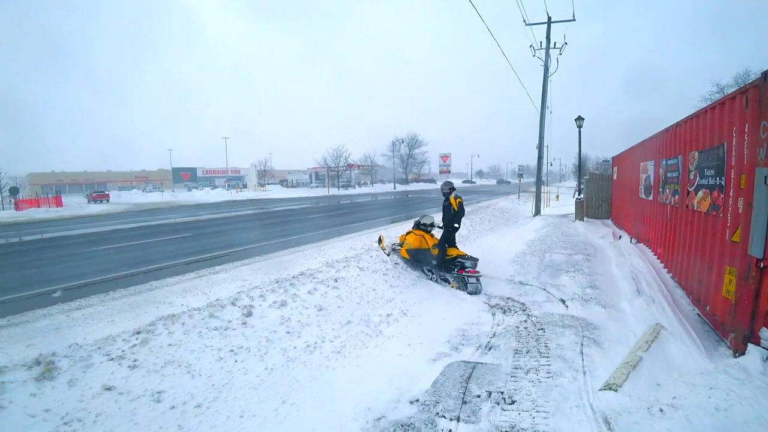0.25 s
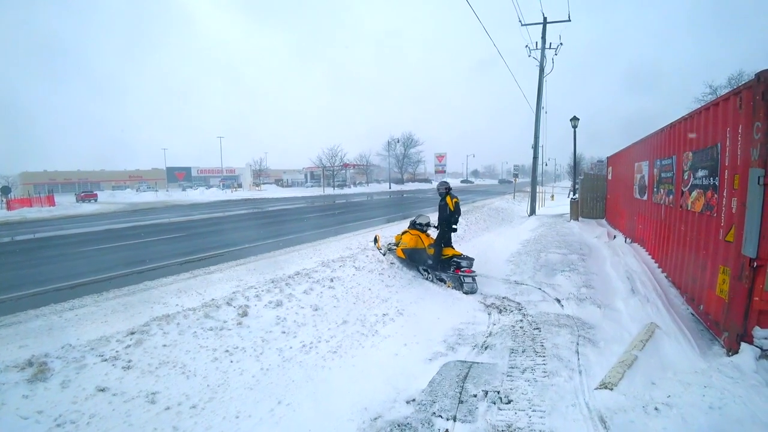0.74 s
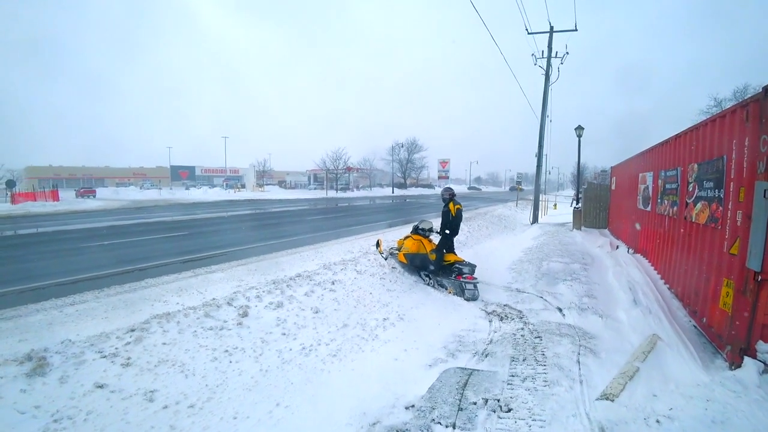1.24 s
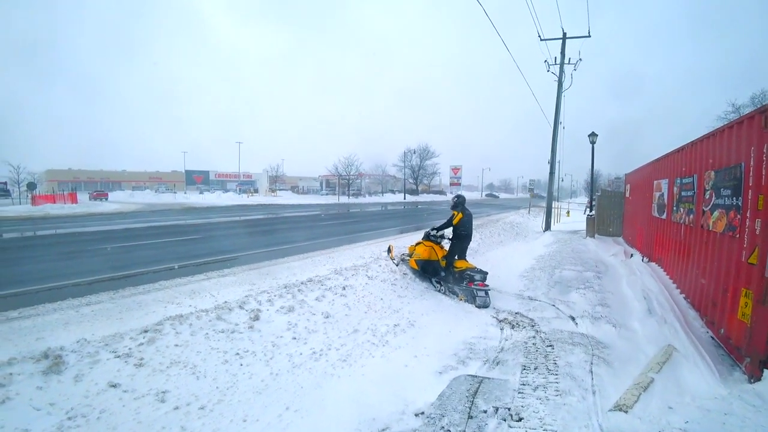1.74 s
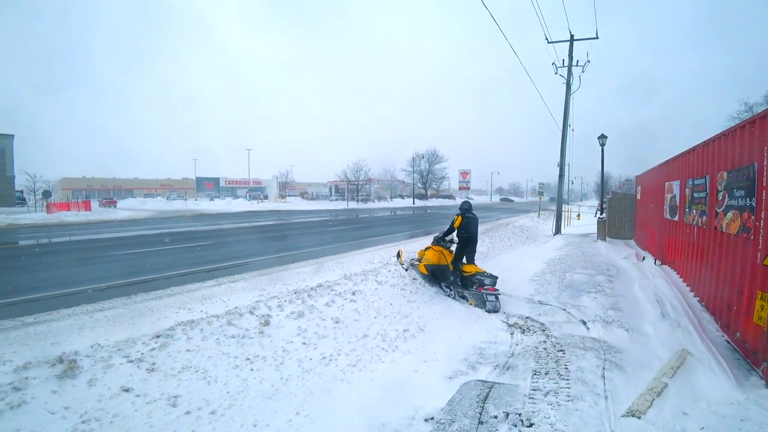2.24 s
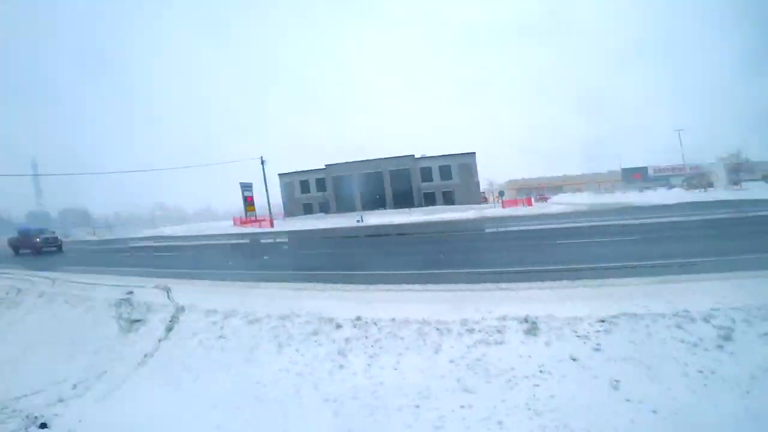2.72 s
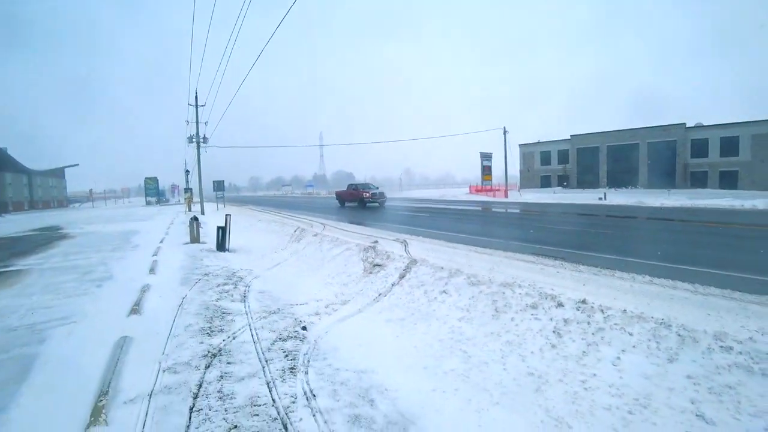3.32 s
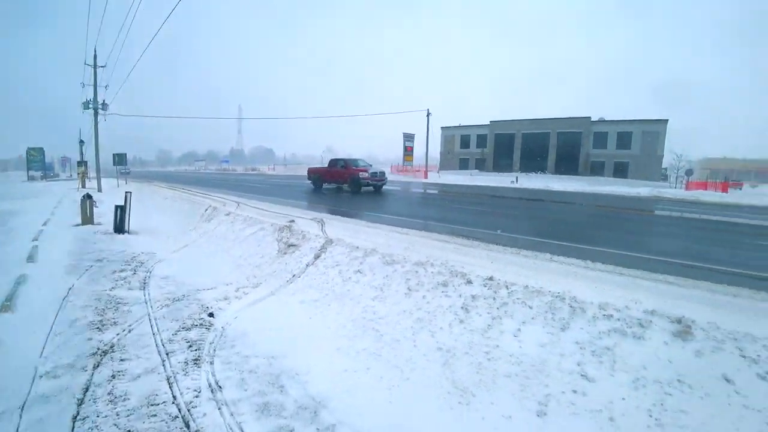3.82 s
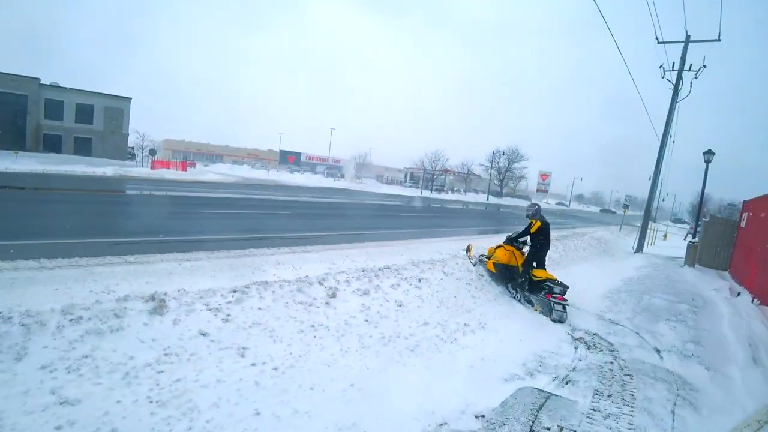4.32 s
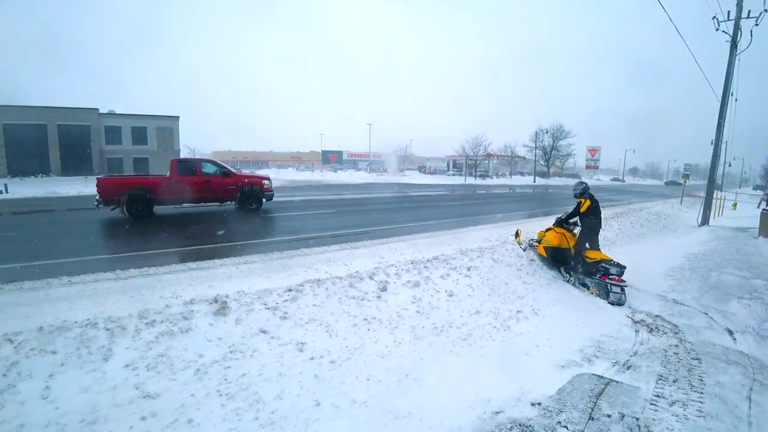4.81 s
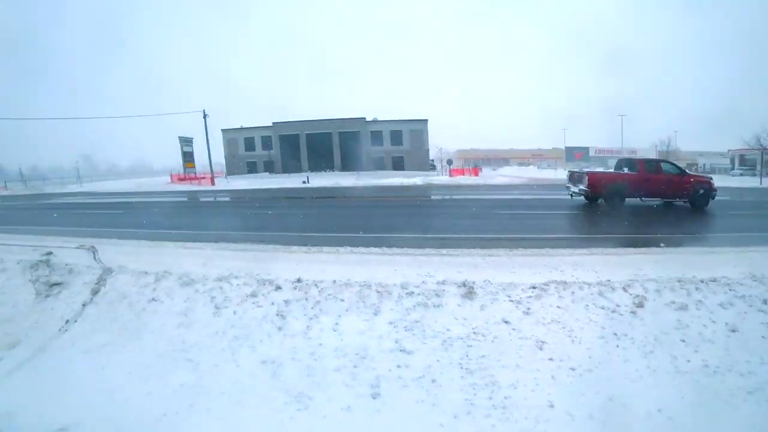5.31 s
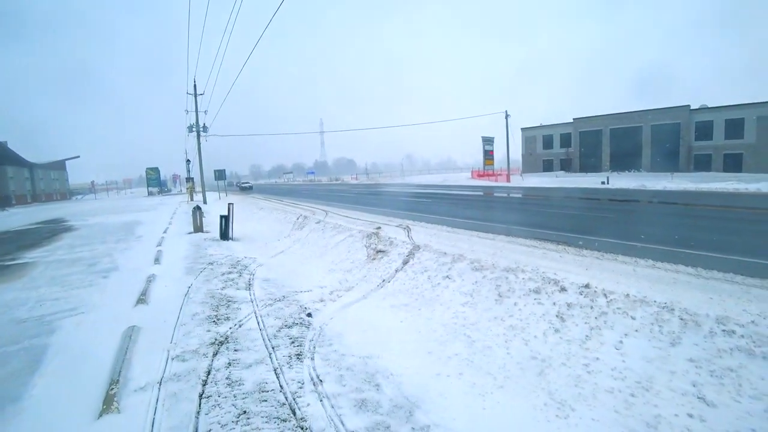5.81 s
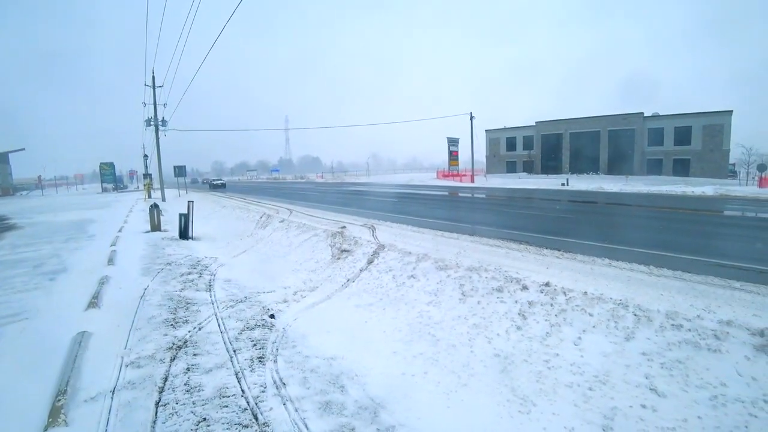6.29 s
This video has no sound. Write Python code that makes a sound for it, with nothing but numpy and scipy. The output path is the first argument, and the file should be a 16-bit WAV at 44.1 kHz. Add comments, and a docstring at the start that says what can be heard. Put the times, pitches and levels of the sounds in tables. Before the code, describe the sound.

Outdoors on a snowy roadside with no echo, a nearby snowmobile engine chugs at idle under light wind rumble. A faint vehicle passes, then wet tyres sizzle closer and a pickup truck goes by with a roar and hiss of spray; another vehicle approaches at the end. Three times the microphone turns with a swish of air, clicks sharply, cuts out for an instant and returns at a different level.

```python
"""At the side of a wet winter road a two-stroke snowmobile idles near the microphone, firing unevenly.
A faint vehicle passes. At 2.7 s the microphone swings up the road, where wet tyres sizzle, and a low
rumble swells as it switches to a louder, bassier setting. At 4 s it swings back and a pickup truck
drives by in the slush; at 5.5 s it turns up the road again. With each swing air swishes past, and the
microphone clicks, drops out for a moment and returns at another level. A breeze buffets it throughout."""
import sys
import numpy as np
from scipy import signal
from scipy.fft import rfft, irfft, next_fast_len
from scipy.io import wavfile
from scipy.ndimage import uniform_filter1d, map_coordinates

SR = 44100
rng = np.random.default_rng(int(sys.argv[2]) if len(sys.argv) > 2 else 0)


def int16_out(signal):
    """Quantize to a 16-bit WAV file."""
    q = np.round(np.clip(np.atleast_2d(signal).T, -1, 1) * 32767)
    wavfile.write(sys.argv[1], SR, q.astype(np.int16))


N = 288855

# the idle hunts a little: (t/s, crankshaft rate/Hz)
IDLE_SPEED = [(0.0, 41.08), (0.53, 39.85), (1.15, 40.45), (1.23, 39.66), (1.64, 40.03), (1.78, 40.94),
              (1.95, 38.92), (2.09, 41.52), (2.45, 40.15), (3.26, 39.54), (3.37, 41.24), (3.51, 39.88),
              (4.41, 40.47), (4.51, 38.93), (4.88, 41.55), (4.96, 40.22), (6.29, 39.89), (6.55, 41.87)]
def crank():
    """Crankshaft turns at every sample, and the firing times: a two-stroke fires once a turn."""
    turns = np.cumsum(np.interp(clock(), *np.transpose(IDLE_SPEED))) / SR + .815
    return turns, np.interp(np.arange(1, int(turns[-1]) + 1), turns, clock())


# gas flow of one exhaust pulse: (f/Hz, level/dB)
EXHAUST_PULSE = [(12, -31), (28, -16.5), (40, 4.5), (80, 3.5), (120, 0), (160, -11.5), (200, -38.5),
                 (280, -41), (325, -44.5), (405, -45.5), (470, -54.5), (620, -64), (900, -80.5),
                 (3000, -130), (8000, -170)]
# the sharper bark of a charge that burns well: (f/Hz, level/dB)
EXHAUST_BARK = [(15, -22), (45, 3), (90, -0.5), (150, -4.5), (200, -14), (290, -19), (420, -21.5),
                (600, -34.5), (1000, -47), (4000, -84.5)]
# crankshaft orders that sing in the silencer and cowling: (multiple, rms level/dB)
CRANK_ORDERS = [(7, -44.5), (9, -49), (10, -47.5), (15, -60.5)]
# gas rushing out of the silencer: (f/Hz, level/dB)
GAS_RASP = [(35, -9), (60, -2.5), (110, 2), (180, 3.5), (280, -1.5), (350, -8), (420, -5.5), (510, -11.5),
            (630, -12.5), (880, -27), (1300, -28.5), (2200, -50), (5000, -68), (13000, -120)]
# clatter of pistons and clutch: (f/Hz, level/dB)
ENGINE_CLATTER = [(600, -24), (1500, 8), (2300, -4), (3700, -4), (6000, -10), (10800, -13.5), (11600, -73)]
def snowmobile(thump_db=-17, bark_db=-29, rasp_db=-35.5, clatter_db=-68, tick_db=-74):
    """Close by, one exhaust pulse per turn; only some charges burn well, and these add a bark."""
    turns, times = crank()
    jitter, strength, quality, knock, scatter = rng.standard_normal((len(times), 5)).T
    stagger_s = .00012 * (-1) ** np.arange(len(times))  # alternate strokes come early and late
    times = times + .00033 * jitter + stagger_s
    flow = shaped(pulses(times, amp(1.12 * strength)), EXHAUST_PULSE)
    radiation_s, bark_lead_s = .004, .0105
    # the outlet radiates the change of flow too: a push, then a suck
    thump = unit(flow + radiation_s * SR * np.gradient(flow))
    burn = 1 / (1 + np.exp(2 - 2 * quality))
    bark = unit(coloured(pulses(times - bark_lead_s + .00099 * scatter, burn), EXHAUST_BARK))
    hum = sum(amp(db + 1.6 * wobble(5.5)) * unit(np.sin(2 * np.pi * order * turns + .88 * wobble(12)))
              for order, db in CRANK_ORDERS)
    # gas noise and clatter swell once a turn, and the pistons tick unevenly
    puff = np.cos(2 * np.pi * turns)
    rasp = unit(rush(GAS_RASP, patchy_db=.5) * amp(4 * puff + .36 * wobble(45)))
    clatter = unit(rush(ENGINE_CLATTER, patchy_db=4) * amp(1.8 * puff + 1.3 * wobble(70)))
    ticks = unit(coloured(pulses(times, amp(9 * np.minimum(knock, 1))), ENGINE_CLATTER))
    exhaust = amp(thump_db) * thump + amp(bark_db) * bark + amp(rasp_db) * rasp
    return exhaust + hum + amp(clatter_db) * clatter + amp(tick_db) * ticks


# the hardest firings: (t/s, peak level/dB)
HARD_POPS = [(.647, -37.5), (1.046, -34.5), (1.843, -36), (3.239, -33), (4.897, -40), (5.877, -33),
             (6.227, -34)]
# one pop in the silencer: (f/Hz, level/dB)
POP_SPECTRUM = [(150, -10), (400, 1), (750, 4.5), (1200, -10.5), (2000, -19.5), (5000, -38), (10000, -56),
                (13000, -120)]
def silencer_pops(soft_share=.06, soft_db=-40.5, spread_db=1.5, t60=.027):
    """Now and then a charge goes off hard; softer pops fall on random firings."""
    _, times = crank()
    levels = soft_db + spread_db * rng.standard_normal(len(times))
    chosen = rng.random(len(times)) < soft_share
    soft_pops = list(zip(times[chosen], levels[chosen]))
    return cracks([(s, db, t60) for s, db in HARD_POPS + soft_pops], POP_SPECTRUM)


# what bends round to the microphone when it is turned away: (f/Hz, gain/dB)
OFF_AXIS_BASS = [(380, -0.5), (520, -11.5), (800, -58.5)]
def shielded(engine, off_axis_db=-2.5):
    """With the microphone turned away, the engine keeps its bass but sounds duller."""
    bass = shaped(engine, OFF_AXIS_BASS)
    return bass + (engine - bass) * amp(off_axis_db * facing_up_road())


# vehicles going by: (nearest t/s, time to cover their distance from us/s, roar/dB, spray/dB, drone/dB)
VEHICLES = [(2.2, 0.4, -51, -73.5, -57), (4.75, 0.55, -44, -56.5, -38.5), (6.8, 0.62, -44.5, -65.5, -63)]
# tyres on wet asphalt: (f/Hz, level/dB)
TYRE_ROAR = [(60, -6.5), (200, 9), (330, 11.5), (520, -10.5), (750, 0.5), (950, -2), (1280, -0.5),
             (1650, -10.5), (2100, -16), (4000, -34.5), (13000, -120)]
# the spray that they throw: (f/Hz, level/dB)
TYRE_SPRAY = [(800, -17.5), (1800, 4), (2100, -7), (2500, 5.5), (3200, 2), (3800, 1.5), (4600, -2.5),
              (5200, -4), (5800, -0.5), (6900, -8.5), (7500, -9.5), (8600, -12.5), (10900, -21.5),
              (11600, -67)]
# the drone of a vehicle abreast of the microphone: (f/Hz, level/dB)
VEHICLE_DRONE = [(80, -3), (200, 9.5), (520, 3), (780, -1), (1000, -13.5), (1600, -25.5), (12000, -120)]
def passing_traffic(roar_lead=.98, spray_lag=.88, far_roar_db=-61.5, far_spray_db=-77.5):
    """From the verge each vehicle swells and fades with distance: first roar, then drone, last spray."""
    def power(db, place):
        """Power from a place along the road, counted in the microphone's distances from the lane."""
        return amp(db - 12 * np.log10(1 + place ** 2)) ** 2

    roar, spray, drone = amp(far_roar_db) ** 2, amp(far_spray_db) ** 2, 0  # far traffic never stops
    for nearest, crossing, roar_db, spray_db, drone_db in VEHICLES:
        place = (clock() - nearest) / crossing
        # the roar goes mostly forward, the spray mostly backward
        roar += power(roar_db, place + roar_lead) + power(roar_db - 10.5, place - roar_lead)
        spray += power(spray_db - 3.5, place + spray_lag) + power(spray_db, place - spray_lag)
        drone += power(drone_db, place)
    off_axis = amp(-10 * facing_up_road())
    return (np.sqrt(roar) * amp(.19 * wobble(10) + 1.9 * wobble(120)) * rush(TYRE_ROAR, patchy_db=1.5)
            + np.sqrt(spray) * amp(.24 * wobble(22)) * rush(TYRE_SPRAY, patchy_db=2)
            + np.sqrt(drone) * off_axis * rush(VEHICLE_DRONE, patchy_db=-.5))


# microphone aimed up the road: (from t/s, until t/s, rumble/dB, first sizzle/dB, its growth/(dB/s))
UP_ROAD = [(2.869, 3.92, -42, -82.5, 18), (5.603, 6.7, -35, -70, 9)]
# the low rumble: (f/Hz, level/dB)
LOW_RUMBLE = [(40, -13), (65, -3), (200, 2), (320, -4.5), (420, -14.5), (600, -28), (2000, -66.5),
              (10000, -120)]
def low_rumble(floor_db=-56):
    """A low rumble that swells while the microphone is switched to its louder, bassier setting."""
    level = amp(floor_db) + sum(between(start, end) * amp(db) for start, end, db, *_ in UP_ROAD)
    return level * amp(1.4 * wobble(25)) * rush(LOW_RUMBLE, patchy_db=2.5)


# treads in the water film, some way up the road: (f/Hz, level/dB)
TREAD_SIZZLE = [(2500, -30), (3700, -12.5), (4350, 1.5), (4800, -3.5), (5250, -18.5), (8000, -32.5),
                (14000, -120)]
def oncoming_tyres():
    """Wet treads sizzle ever louder as they approach."""
    level = 0
    for start, end, _, first_db, growth in UP_ROAD:
        age = np.clip(clock(), start, end) - start
        level += between(start, end) * amp(first_db + growth * age)
    return level * amp(1.1 * wobble(46)) * rush(TREAD_SIZZLE, patchy_db=-2.5)


def facing_up_road():
    """1 while the microphone points up the road, else 0."""
    return sum(between(start, end) for start, end, *_ in UP_ROAD)


# the microphone swings round: (fastest t/s, level/dB, rise/s, fall/s)
MIC_SWINGS = [(2.729, -38, 0.19, 0.14), (3.99, -39, 0.12, 0.15), (5.471, -40.5, 0.33, 0.16)]
# air and clothing sweeping close past it: (f/Hz, level/dB)
AIR_SWISH = [(70, -5.5), (250, 6.5), (600, 1), (1200, -8.5), (1800, -10.5), (2600, -12.5), (4300, -20),
             (6300, -26), (8500, -38), (11000, -42), (12500, -100)]
def swishes(flutter_db=.74):
    """Air and clothing swish past as each swing speeds up and slows down."""
    t = clock()
    sweep = sum(amp(db) * np.exp(-((t - s) / np.where(t < s, rise, fall)) ** 2)
                for s, db, rise, fall in MIC_SWINGS)
    return sweep * amp(flutter_db * wobble(45)) * rush(AIR_SWISH, patchy_db=-.46)


# the microphone drops out: (gone t/s, back t/s, gain afterwards/dB)
MIC_DROPOUTS = [(2.836, 2.874, 6), (3.899, 3.947, 1), (5.554, 5.592, 6.5)]
def dropout_gain(gap_db=-15, fall_s=.0083, rise_s=.039, settle_s=.067, shortfall_db=5):
    """The microphone's gain sinks in each dropout, then climbs to its new value."""
    t, level_db, before_db = clock(), np.zeros(N), 0
    for gone, back, after_db in MIC_DROPOUTS:
        sinking = np.clip((t - gone) / fall_s + .5, 0, 1)
        rising = np.clip((t - back) / rise_s + .5, 0, 1)
        settling_db = shortfall_db * np.exp(-np.maximum(t - back, 0) / settle_s)
        level_db += sinking * (gap_db - before_db) + rising * (after_db - gap_db - settling_db)
        before_db = after_db
    return amp(level_db)


# sharp clicks at the microphone: (t/s, peak level/dB, t60/s, top treble gain/dB)
MIC_CLICKS = [(.749, -35.5, .009, -30.5), (0.761, -41, 0.0033, -28), (2.824, -13, 0.0034, -10),
              (2.832, -30, .0063, -26.5), (3.886, -24, 0.013, -37.5), (3.892, -15.5, 0.013, -37.5),
              (4.111, -32, .0048, -16), (5.5397, -12.5, 0.0027, -20.5), (5.79, -34, 0.0055, -33)]
# one click, below its top treble: (f/Hz, level/dB)
CLICK_SPECTRUM = [(300, -18), (900, 5), (1400, -4.5), (2200, -1), (3200, 0.5), (4500, 1), (7000, -2),
                  (11300, -6.5)]
# brief rubs against the housing: (t/s, level/dB, half-width/s)
HOUSING_RUBS = [(3.889, -34.5, 0.015), (4.003, -38, 0.0093)]
# their friction noise: (f/Hz, level/dB)
RUB_SPECTRUM = [(400, -25), (900, 8.5), (1400, -0.5), (1800, 1), (2450, 1.5), (2900, -18.5), (6000, -29),
                (11000, -33.5), (13000, -120)]
def clicks_and_rubs(ticks_per_dropout=5, window_s=.18, tick_db=-41, top_hz=12400):
    """Clicks at the microphone, the loudest as it switches and drops out; faint ticks and rubs follow."""
    rubs = sum(amp(db) * np.exp(-((clock() - s) / width) ** 2) for s, db, width in HOUSING_RUBS)
    ticks = [(back + .02 + window_s * rng.random(), tick_db + 1.5 * rng.standard_normal(), .003, -28.5)
             for _, back, _ in MIC_DROPOUTS for _ in range(ticks_per_dropout)]
    clicks = sum(cracks([(s, db, t60)], CLICK_SPECTRUM + [(top_hz, top_db)], push=2.9)
                 for s, db, t60, top_db in MIC_CLICKS + ticks)
    return clicks + rubs * rush(RUB_SPECTRUM, patchy_db=2)


# wind on the microphone: (f/Hz, level/dB)
WIND_BUFFET = [(6, -24.5), (18, 0), (27, 3.5), (60, -3), (110, -18.5), (1500, -120)]
def breeze(level_db=-35):
    """Light gusts rumble on the microphone."""
    return amp(level_db + 1.3 * wobble(2.6)) * rush(WIND_BUFFET, patchy_db=-3)


def whine(hz=10000, level_db=-83):
    """A faint electronic whine, absent while the microphone points up the road."""
    tone = unit(np.sin(2 * np.pi * hz * clock()))
    return (1 - facing_up_road()) * amp(level_db + 2.5 * wobble(3.3)) * tone


def amp(db):
    """Decibels to gain."""
    return 10 ** (np.asarray(db) / 20)


def unit(x):
    """Scale to rms 1."""
    return x / np.sqrt(np.mean(x ** 2) + 1e-20)


def clock():
    """The time of every sample."""
    return np.arange(N) / SR


def between(start, end, turn_s=.09):
    """1 from start to end, with edges as long as a turn of the microphone."""
    return np.clip(np.minimum(clock() - start, end - clock()) / turn_s + .5, 0, 1)


def wobble(rate):
    """A smooth random curve, rate knots a second."""
    return map_coordinates(rng.standard_normal(int(N * rate / SR) + 4), [clock() * rate])


def bin_gains(points, size):
    """The gain at each FFT bin, from (f/Hz, level/dB) points."""
    hz, db = np.transpose(points)
    return amp(np.interp(np.log(np.fft.rfftfreq(size, 1 / SR) + 1), np.log(hz), db))


def shaped(x, points):
    """x through a zero-phase filter; a single push becomes a smooth swell."""
    size = next_fast_len(N + SR // 2)
    return irfft(rfft(x, size) * bin_gains(points, size), size)[:N]


def coloured(x, points, size=32768):
    """x through a causal, minimum-phase filter; attacks stay sharp."""
    cepstrum = irfft(np.log(bin_gains(points, size)))
    cepstrum[1:size // 2] *= 2
    cepstrum[size // 2 + 1:] = 0
    return signal.fftconvolve(x, irfft(np.exp(rfft(cepstrum))))[:len(x)]


def rush(spectrum, patchy_db):
    """Noise of rms 1 with drifting patches of random gain."""
    cells = signal.stft(rng.standard_normal(N), nperseg=512)[2]
    patches = uniform_filter1d(rng.standard_normal(cells.shape), size=5, axis=0)
    patches = uniform_filter1d(patches, size=18, axis=1)
    noise = signal.istft(cells * amp(patchy_db * unit(patches)))[1][:N]
    return unit(coloured(noise, spectrum))


def pulses(times, sizes):
    """Single-sample pushes at the given times."""
    return np.bincount(np.clip(np.round(times * SR).astype(int), 0, N), sizes, N + 1)[:N]


def cracks(rows, spectrum, push=3):
    """For each (t/s, peak level/dB, t60/s) row, a sharp push and a dying burst of noise."""
    out, t = np.zeros(N + SR), np.arange(SR // 20) / SR
    for s, db, t60 in rows:
        burst = rng.standard_normal(len(t)) * amp(-60 * t / t60)
        burst[0] = push
        crack = coloured(burst, spectrum, size=2048)
        out[round(s * SR):][:len(t)] += amp(db) * crack / np.abs(crack).max()
    return out[:N]


def scene():
    """Mono, from the roadside; open snow gives no echo."""
    picked_up = shielded(snowmobile()) + passing_traffic() + low_rumble() + oncoming_tyres() + swishes()
    at_microphone = breeze() + whine() + clicks_and_rubs()
    return (dropout_gain() * (picked_up + silencer_pops()) + at_microphone)[None]


def record(dry, ceiling=.95, top_hz=15800):
    """The recorder rounds off the highest peaks and keeps nothing above its band limit."""
    rounded = dry / (1 + np.abs(dry / ceiling) ** 10) ** (1 / 10)
    size = next_fast_len(N + SR // 2)
    in_band = np.fft.rfftfreq(size, 1 / SR) < top_hz
    return irfft(rfft(rounded, size) * in_band, size)[:, :N]


dry = scene()
out = record(dry)
int16_out(out)
```